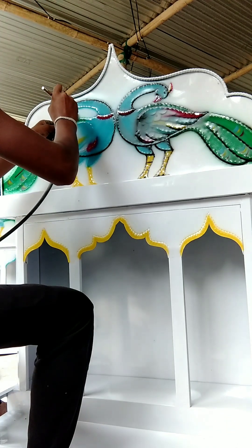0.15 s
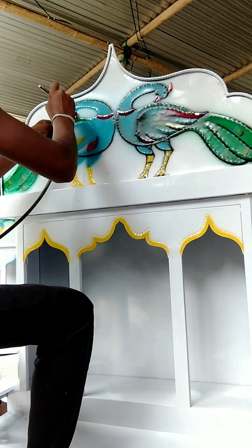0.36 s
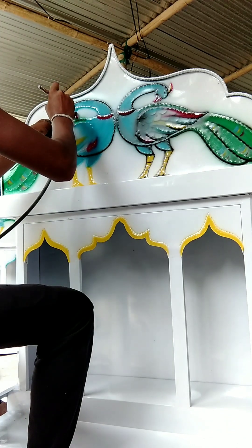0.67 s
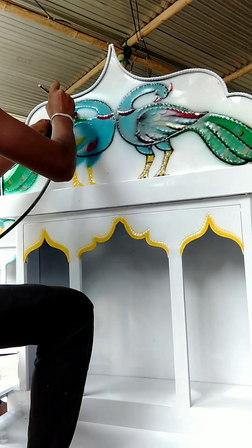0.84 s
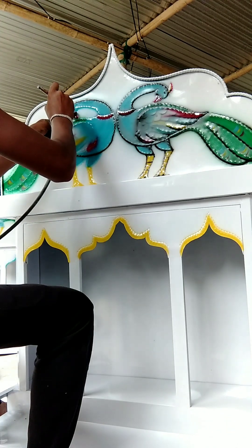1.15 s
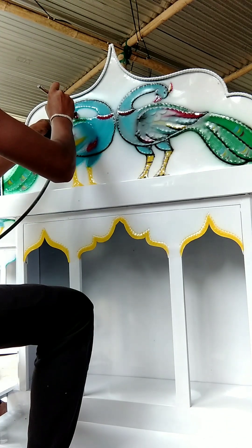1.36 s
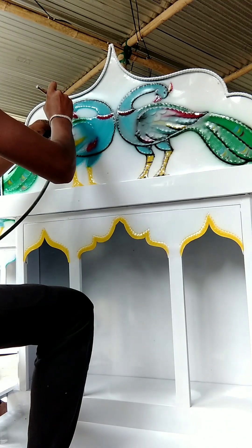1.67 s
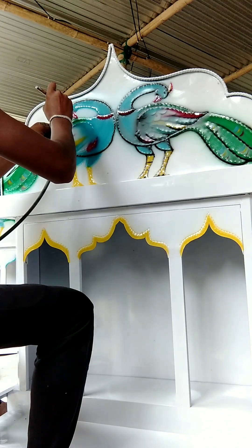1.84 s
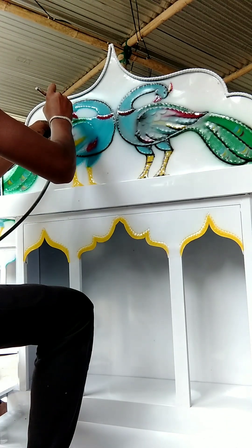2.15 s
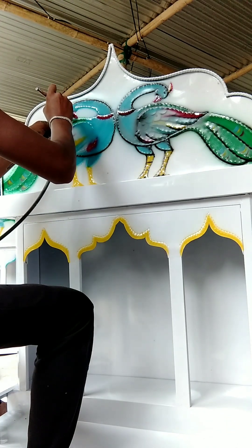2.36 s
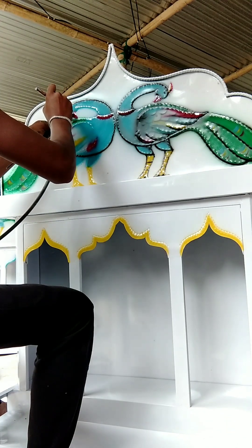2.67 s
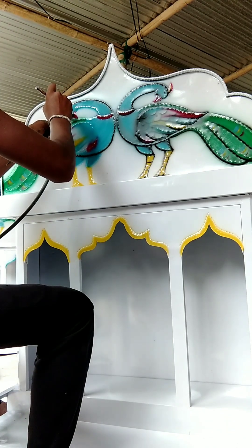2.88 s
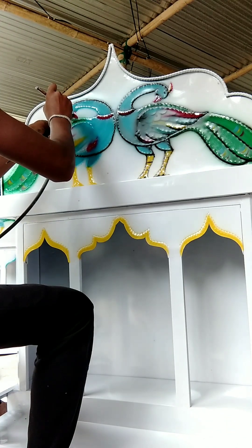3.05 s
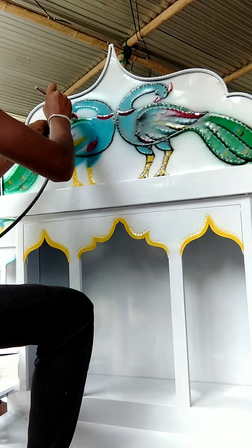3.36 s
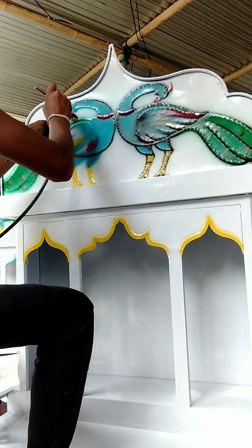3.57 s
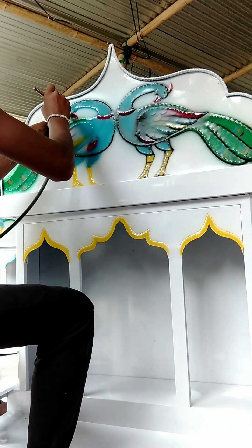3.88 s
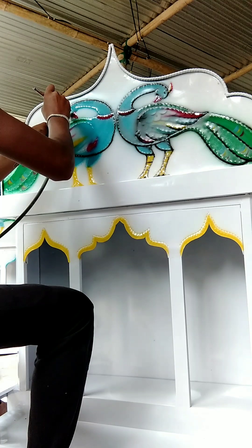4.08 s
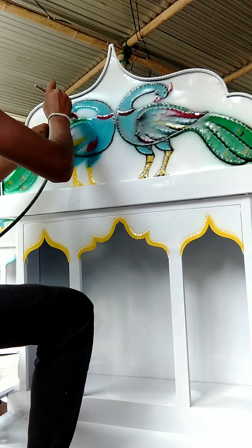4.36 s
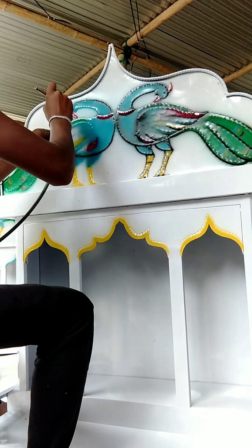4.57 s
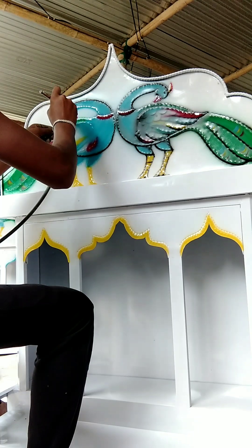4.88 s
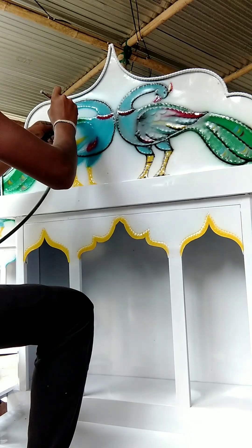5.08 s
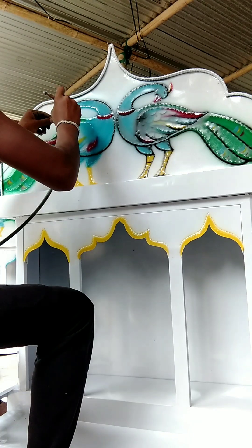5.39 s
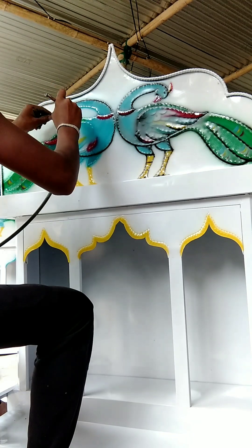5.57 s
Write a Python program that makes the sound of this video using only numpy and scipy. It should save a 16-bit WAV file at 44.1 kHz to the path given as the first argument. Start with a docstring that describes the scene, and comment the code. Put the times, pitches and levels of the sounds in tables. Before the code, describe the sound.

Close stereo pickup of a painter working on a decorated panel. A steady low mechanical drone, broadband rush and faint high whistles never stop. One short, sharp airbrush hiss comes first; after nearly two seconds a second, longer one grows brighter and sputters, buffeting the left side before cutting off. Then only the compressor remains.

```python
"""Airbrush and compressor in a tin-roofed workshop

An airbrush lays two bursts of paint on a panel: turbulent noise, gated by the trigger and combed by an echo.
A small compressor chugs throughout as a sum of stroke harmonics, over a rush of broadband noise.
With each stroke air sizzles through its valve: partly repeating noise, with faint whistles from narrow resonances.
The jet sputters, shifts colour as the hand moves and rings briefly in the shed.
At full blast low-frequency eddies and a pressure thump reach the left microphone port as the panel flutters."""
import sys
import numpy as np
from scipy import signal
from scipy.fft import rfft, irfft
from scipy.io import wavfile
from scipy.ndimage import map_coordinates

SR = 44100
rng = np.random.default_rng(int(sys.argv[2]) if len(sys.argv) > 2 else 0)


def master_out(mix):
    """Clip the mix to full scale and print it as 16-bit PCM to the path in sys.argv[1]."""
    frames = np.transpose(np.atleast_2d(mix))
    ceiling = np.clip(frames, -1, 1)
    pcm = np.round(ceiling * 32767).astype(np.int16)
    wavfile.write(sys.argv[1], SR, pcm)


N = 252693
TIME = np.arange(N) / SR  # s
FREQS = np.maximum(np.fft.rfftfreq(N, 1 / SR), 1)  # Hz, kept off zero

# Strong compressor harmonics, before buzz and drift:
# [multiple of the stroke rate/1, left level/dB, right level/dB]
HARMONICS = [(1, -57, -58), (2, -54, -55), (3, -67, -74), (4, -53, -53), (5, -48, -47), (6, -51, -52),
             (7, -50, -53), (8, -46, -45), (9, -49, -49), (10, -43, -45), (11, -66, -64), (12, -59, -62),
             (13, -51, -56), (14, -54, -61), (15, -49, -65), (16, -62, -72), (17, -55, -58), (18, -59, -56),
             (19, -49.5, -58), (20, -63, -62), (21, -47.5, -57), (22, -60, -62), (23, -56, -56),
             (24, -46, -56), (25, -49, -48), (26, -61, -62), (27, -58, -61), (28, -55, -53), (29, -51, -54),
             (30, -52, -61), (32, -58, -64), (33, -59, -62), (35, -64, -70), (36, -68, -70), (37, -68, -64),
             (39, -57, -59), (42, -54, -70), (44, -61, -67), (47, -59, -59), (49, -60, -68), (58, -61, -70),
             (63, -62, -71)]
# Casing buzz, in full at the casing resonance: [t/s, level/dB]
CASING_BUZZ = [(0, -2), (2.15, -2), (3.2, 1.5), (5.73, 0.5)]
# Standing waves in the shed put the ports out of step: [f/Hz, phase lead of the left/rad]
STANDING_WAVES = [(200, 0), (460, .3), (660, 1.5), (850, .5), (970, 2.2), (1150, .4), (1290, 1.8),
                  (1400, .7), (2000, 1.3)]
# Rush of the compressor and the shed: [f/Hz, left level/(dB per Hz), right level/(dB per Hz)]
RUSH_SPECTRUM = [(25, -85.5, -83), (80, -85, -85), (160, -87.5, -87), (290, -75.5, -76.5), (400, -76, -77),
                 (560, -80, -81), (740, -81, -86), (1180, -74.5, -77), (1600, -80.5, -82.5),
                 (2200, -79, -81), (3400, -79, -81), (5000, -82, -83)]
# Air through the pump's valve, before its fade: [f/Hz, left level/(dB per Hz), right level/(dB per Hz)]
VALVE_SPECTRUM = [(4600, -96, -100), (5560, -81, -83.5), (6840, -77.5, -78), (7400, -77.5, -73.5),
                  (8230, -69, -78), (8440, -66.5, -67), (8480, -73.5, -72), (8670, -66, -67.5),
                  (9070, -63.5, -66.5), (9510, -73.5, -75.5), (10100, -71.5, -79), (10570, -78.5, -78.5),
                  (11570, -81.5, -87), (12400, -87.5, -93), (13100, -84, -93), (14300, -90, -101)]
# Whistles of the valve, before its fade: [f/Hz, left level/dB, right level/dB]
VALVE_WHISTLES = [(8425, -52, -54), (8812, -53, -45)]
# Trigger pulls: [t pressed/s, t released/s, swell while held/(dB per s), panel echo gain/1]
TRIGGER_PULLS = [(0.807, 1.585, 2.5, 0.11), (3.278, 4.309, 6, 0.26)]
# Squeezes, the trigger drawn further back: [t squeezed/s, t eased/s, extra level/dB, easing time/s]
TRIGGER_SQUEEZES = [(1.004, 1.098, 2.5, 0.014), (1.115, 1.156, 4, 0.039), (3.6, 3.797, 1.5, 0.12),
                    (3.944, 4.192, 4.5, 0.13)]
# Jet with the resonances of the gap between hand and panel:
# [f/Hz, left relative level/dB, right relative level/dB]
JET_SPECTRUM = [(1500, -78, -83), (1900, -76.5, -80), (2300, -76.5, -79.5), (2600, -80, -82),
                (2900, -70.5, -70.5), (3300, -70.5, -70), (3600, -68.5, -67.5), (3950, -71.5, -72),
                (4400, -69, -69), (4900, -66.5, -67), (5500, -67, -67), (5880, -61.5, -64.5),
                (6250, -69, -69), (6700, -63, -62), (7050, -65.5, -65), (7400, -64.5, -66),
                (8200, -60, -60), (8750, -61, -59.5), (9400, -55, -62.5), (10000, -60, -66.5),
                (10400, -63, -65.5), (11100, -60, -66.5), (11700, -57.5, -67), (12200, -63.5, -73),
                (12600, -64, -71.5), (13100, -68, -72.5), (13900, -66, -73.5), (14300, -67, -74)]
# Part of the jet that both ports hear alike: [f/Hz, power share/1, phase lead of the left/rad]
DIRECT_SOUND = [(1500, .2, 1.5), (2400, .05, 0), (2800, .4, 0), (3250, .1, 1), (3700, .62, 2.9),
                (4300, .97, 3.14), (4900, .88, 3.14), (5450, .92, 3.2), (5900, .35, 4.4), (6250, .8, 6.2),
                (7000, .55, 7.5), (7500, .25, 6), (8500, .15, 4.5), (9000, .5, 6.7), (9600, .6, 5.8),
                (10200, .1, 5), (11400, .55, 3.5), (12100, .1, 3), (14000, .2, 2.5)]
# Flutter of the panel at full stream: [f/Hz, left level/(dB per Hz), right level/(dB per Hz)]
PANEL_FLUTTER = [(60, -77, -75), (170, -78, -81), (400, -74, -79)]

# The compressor slows very slightly as the tank fills, and runs a little ahead or behind
STROKE_HZ, SAG_HZ_PER_S, SLIP_TURNS = 46.155, .011, 0.0018
CHUG_S_PER_HZ = .000141  # within a stroke, each Hz lower arrives this much later
VALVE_DB, VALVE_FADE_DB_PER_S = -0.17, 0.21  # starting gain and slow weakening of the hiss
# Greatest power share of the hiss that repeats each stroke; centre and half-width of that band
SIZZLE_SHARE, SIZZLE_HZ, SIZZLE_WIDTH_HZ = .35, 8900, 900
JET_DB = -24.5  # level at which every pull starts
SQUEEZE_S = 0.14  # time the finger takes to draw back
PANEL_LAG_S = .000427  # delay of the echo off the panel
BODY_HZ, BODY_GROWTH = 3240, 0.53  # below this the jet grows more slowly; dB per dB of flow
SWAY, SWAY_HZ = 0.00792, 3  # approximate detuning share from the moving hand, and its rate
LAG_WANDER_S, LAG_WANDER_HZ = .000008, 5.8  # shift of the right path against the left
PUFF_FROM_S, PUFF_TO_S = 4.057, 4.275  # the stream, thrown back by the panel, meets the left port
PUFF_DB, PUSH_DB = -45.5, -36  # its eddies and its steady pressure
TOP_HZ = 14250  # passband edge of the final low-pass


def undb(db):
    """Logarithmic level: decibels become an amplitude ratio."""
    return 10 ** (np.asarray(db) / 20)


def unit(x):
    """Normalisation: scale to a root-mean-square value of 1."""
    return x / np.sqrt(np.mean(x ** 2))


def walk(rate_hz):
    """Low-pass noise: a smooth random course of rms 1, changing about rate_hz times a second."""
    return unit(irfft(rfft(rng.standard_normal(N)) / (1 + (FREQS / rate_hz) ** 4), N))


def compressor(turns, casing_hz=1200, casing_width_hz=260, scatter_hz=700, unsteady=0.26,
               overtone_db=-66, overtone_fall_db=3, count=100):
    """Fourier synthesis: piston harmonics, with casing resonance, dispersion and scattered, drifting highs."""
    out = np.zeros((2, N))
    strong = {round(multiple): sides_db for multiple, *sides_db in HARMONICS}
    knots = np.linspace(0, TIME[-1], 80)
    buzz_db = np.interp(knots, *np.transpose(CASING_BUZZ))
    for multiple in range(1, count):
        hz = multiple * STROKE_HZ
        # between the strong harmonics lies a faint, uneven comb from the valve clatter
        octaves_off = abs(np.log2(hz / casing_hz))
        faint_db = overtone_db - overtone_fall_db * octaves_off + 4.5 * rng.standard_normal(2)
        sides_db = np.array(strong.get(multiple, faint_db))
        casing = 1 / (1 + ((hz - casing_hz) / casing_width_hz) ** 2)
        scattered = hz ** 8 / (hz ** 8 + scatter_hz ** 8)
        drift = 1 + unsteady * (scattered + .08) * rng.standard_normal((2, len(knots)))
        # sqrt(2) turns rms level into sine amplitude
        left, right = np.sqrt(2) * drift * undb(sides_db[:, None] + casing * buzz_db)
        # the lows arrive late, so each stroke is a falling chug; the shed scatters the highs
        early_turns = CHUG_S_PER_HZ * hz ** 2 / 2 + scattered * rng.standard_normal()
        angle = 2 * np.pi * (multiple * turns + early_turns)
        lead = np.interp(hz, *np.transpose(STANDING_WAVES))
        out[0] += np.interp(TIME, knots, left) * np.sin(angle)
        out[1] += np.interp(TIME, knots, right) * np.sin(angle - lead)
    return out


def colour(x, table, skirt_db=24):
    """Linear filtering: shape noise to a table's spectra, falling by skirt_db an octave past its ends."""
    hz, *sides = np.transpose(table)
    octave, points = np.log2(FREQS), np.log2(hz)
    beyond = np.abs(octave - np.clip(octave, points[0], points[-1]))
    db = np.array([np.interp(octave, points, side) for side in sides]) - skirt_db * beyond
    return irfft(rfft(x) * undb(db), N) * np.sqrt(SR / 2)


def diffuse(alike_hz):
    """Diffuse-field coherence: the ports nearly agree well below alike_hz and are unrelated well above."""
    mid, side = rfft(rng.standard_normal((2, N)))
    likeness = .97 / (1 + (FREQS / alike_hz) ** 4)
    mid, side = mid * np.sqrt(1 + likeness), side * np.sqrt(1 - likeness)
    return unit(irfft([mid + side, mid - side], N))


def rush(turns, throb=0.066):
    """Amplitude modulation: valve and fan noise swells with each piston stroke."""
    stroke = 1 + throb * np.cos(2 * np.pi * turns)
    return colour(diffuse(alike_hz=825) * unit(stroke), RUSH_SPECTRUM)


def waver(table, width_hz):
    """Resonance: noise ringing in narrow bands gives unsteady tones."""
    tones = np.zeros((2, N))
    for hz, *sides_db in table:
        resonance = 1 / (1 + 1j * (FREQS - hz) / width_hz) ** 2
        ring = irfft(rfft(rng.standard_normal((2, N))) * resonance, N)
        tones += undb(sides_db)[:, None] * unit(ring)
    return tones


def valve(turns, ripple=0.045, flicker_db=0.53, whistle_width_hz=10):
    """Cyclic turbulence: each stroke repeats a sizzle over fresh hiss and faint resonant whistles."""
    size = round(SR / STROKE_HZ)  # samples in one stroke
    strokes = rng.standard_normal((2, size))
    sizzle = np.array([map_coordinates(stroke, [turns * size], order=5, mode="grid-wrap")
                       for stroke in strokes])
    fresh = rng.standard_normal((2, N))
    share = SIZZLE_SHARE / (1 + ((FREQS - SIZZLE_HZ) / SIZZLE_WIDTH_HZ) ** 2)
    air = irfft(np.sqrt(share) * rfft(sizzle) + np.sqrt(1 - share) * rfft(fresh), N)
    level_db = VALVE_DB - VALVE_FADE_DB_PER_S * TIME + flicker_db * walk(25)
    pressure = (1 + ripple * np.cos(2 * np.pi * turns)) * undb(level_db)
    return pressure * (colour(air, VALVE_SPECTRUM) + waver(VALVE_WHISTLES, whistle_width_hz))


def gate(on, off, rise_s, fall_s):
    """Linear envelope: attack, hold and release, from 0 to 1 and back."""
    return np.clip((TIME - on) / rise_s, 0, 1) * np.clip(1 - (TIME - off) / fall_s, 0, 1)


def extra_flow():
    """Level growth with flow: dB above the start of a pull, from its swell and each squeeze."""
    extra_db = np.zeros(N)
    for pressed, released, db_per_s, _ in TRIGGER_PULLS:
        held_s = np.minimum(TIME, released) - pressed
        extra_db = np.where(held_s > 0, db_per_s * held_s, extra_db)
    for squeezed, eased, db, ease_s in TRIGGER_SQUEEZES:
        extra_db = extra_db + db * gate(squeezed, eased, SQUEEZE_S, ease_s)
    return extra_db


def delay(x, seconds):
    """Phase-shift theorem: a linear phase delays by any fraction of a sample."""
    return irfft(rfft(x) * np.exp(-2j * np.pi * FREQS * seconds), N)


def shed(x, t60):
    """Exponential reverberant decay: a short, dense tail from roof and panels, different at each port."""
    t = TIME[:SR // 2]
    tail = rng.standard_normal((2, len(t))) * np.exp(-np.log(1000) * t / t60) * (t > .004)
    tail /= np.sqrt(np.sum(tail ** 2, axis=1, keepdims=True))
    return signal.fftconvolve(x[None], tail, axes=1)[:, :N]


def sway(x, late_s):
    """Doppler shift: each channel travels a path whose delay keeps changing."""
    return np.array([map_coordinates(side, [(TIME - late) * SR], order=5, mode="mirror")
                     for side, late in zip(x, late_s)])


def airbrush(open_s=0.034, close_s=0.043, sputter_growth=0.11, room_db=-13):
    """Jet turbulence and comb interference: with more flow the hiss brightens and paint tears off unevenly."""
    extra_db = extra_flow()
    sputter = undb(sputter_growth * extra_db * walk(150))
    hz, share, lead = np.transpose(DIRECT_SOUND)
    share, lead = np.interp(FREQS, hz, share), np.interp(FREQS, hz, lead)
    jet = rng.standard_normal(N)
    straight = rfft(jet) * np.exp(-1j * np.outer([0, 1], lead))
    # the painter's hand and arm scatter the rest
    scattered = rfft(rng.standard_normal((2, N)))
    near = irfft(np.sqrt(share) * straight + np.sqrt(1 - share) * scattered, N)
    heard = 0
    for pressed, released, _, echo in TRIGGER_PULLS:
        opening = gate(pressed, released, open_s, close_s) * sputter
        # the panel, a few centimetres from the nozzle, combs the hiss into bright bands
        combed = near + echo * delay(near, PANEL_LAG_S)
        heard = heard + combed * opening + undb(room_db) * shed(jet * opening, t60=0.3)
    heard = colour(heard, JET_SPECTRUM) / np.std(colour(near, JET_SPECTRUM))
    body = irfft(rfft(heard) / (1 + (FREQS / BODY_HZ) ** 8), N)
    treble = heard - body
    hiss = undb(JET_DB) * (body * undb(BODY_GROWTH * extra_db) + treble * undb(extra_db))
    hand_s = SWAY / (np.pi * SWAY_HZ) * walk(SWAY_HZ)
    return sway(hiss, [hand_s, hand_s + LAG_WANDER_S * walk(LAG_WANDER_HZ)])


def draught(buffet_hz=24, build_s=0.0057, settle_s=0.035, thump=0.6, thump_s=0.023):
    """Flow pressure: a puff thumps on the left port, buffets it and ebbs away while the panel flutters."""
    band = FREQS / (FREQS + 10) / (1 + (FREQS / buffet_hz) ** 1.9)
    eddies = irfft(rfft(rng.standard_normal(N)) * band, N)
    since = np.maximum(TIME - PUFF_FROM_S, 0)
    ebb = np.exp(-np.maximum(TIME - PUFF_TO_S, 0) / settle_s)
    stream = np.minimum(since / build_s, 1) * ebb
    push = undb(PUSH_DB) * (1 + thump * np.exp(-since / thump_s))
    buffet = np.array([unit(eddies) * undb(PUFF_DB) - push, np.zeros(N)])
    return stream * (buffet + colour(diffuse(alike_hz=500), PANEL_FLUTTER))


def scene():
    """Superposition: compressor, rush, valve, airbrush and draught add linearly."""
    # integrating the stroke rate gives the count of turns
    turns = np.cumsum(STROKE_HZ - SAG_HZ_PER_S * TIME) / SR + SLIP_TURNS * walk(1)
    return compressor(turns) + rush(turns) + valve(turns) + airbrush() + draught()


def record(dry):
    """Saturation and band limiting: the loudest peaks are rounded and the top is cut steeply."""
    rounded = np.tanh(dry)
    low_pass = signal.ellip(12, .1, 80, TOP_HZ, fs=SR, output="sos")
    return signal.sosfilt(low_pass, rounded)


dry = scene()
out = record(dry)
master_out(out)
```